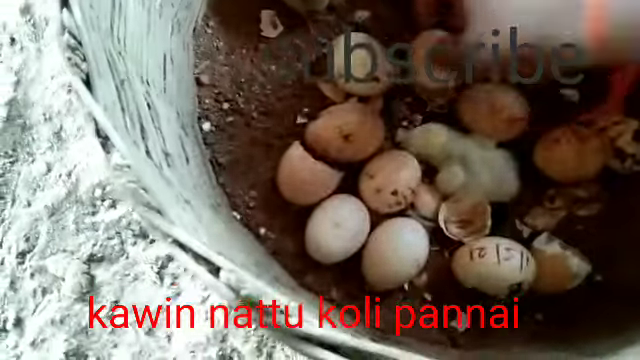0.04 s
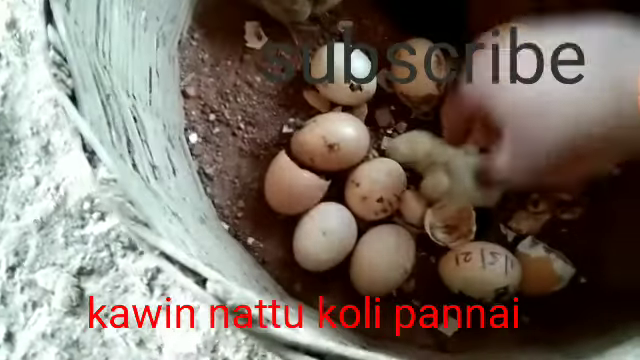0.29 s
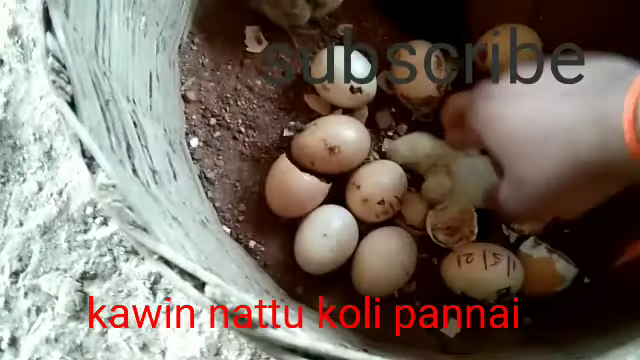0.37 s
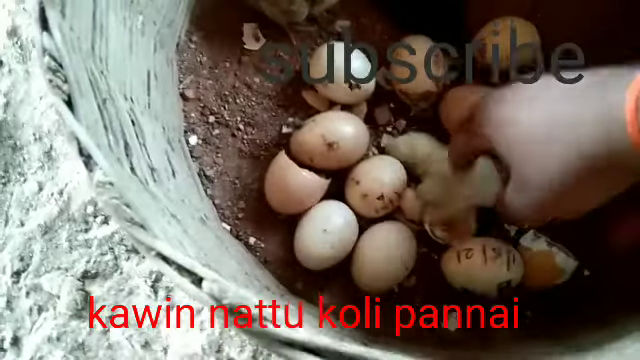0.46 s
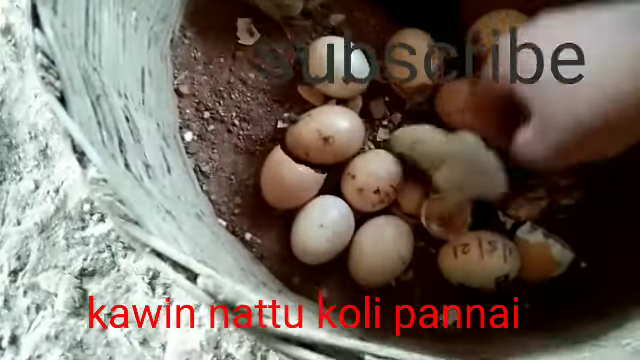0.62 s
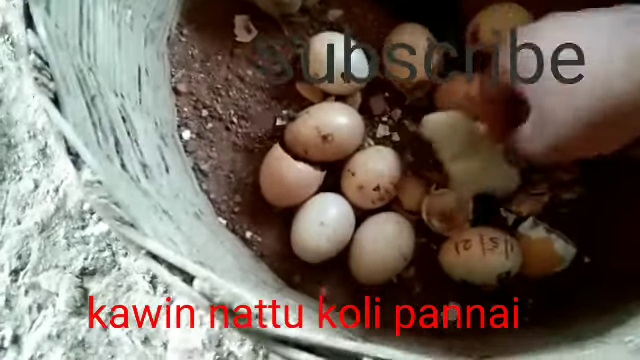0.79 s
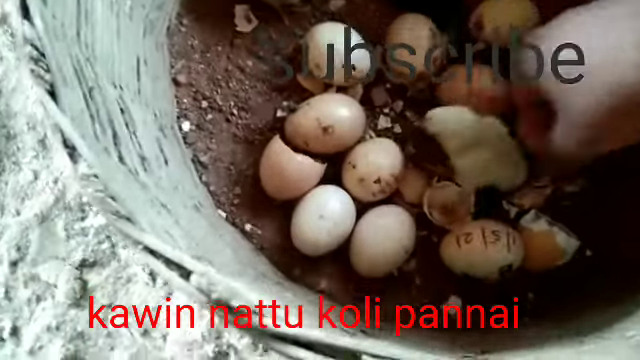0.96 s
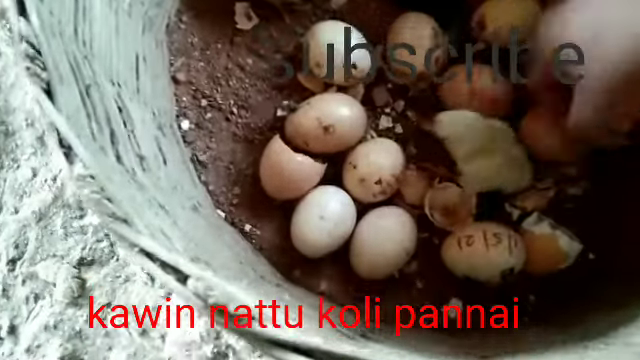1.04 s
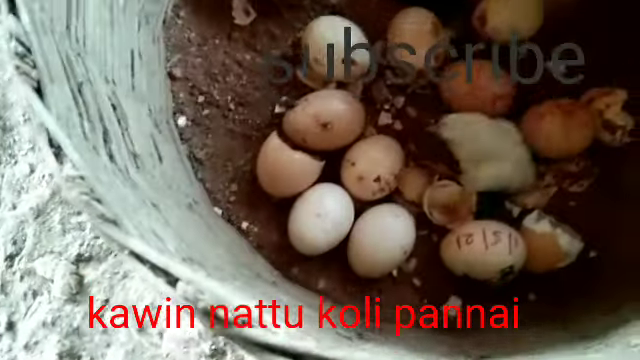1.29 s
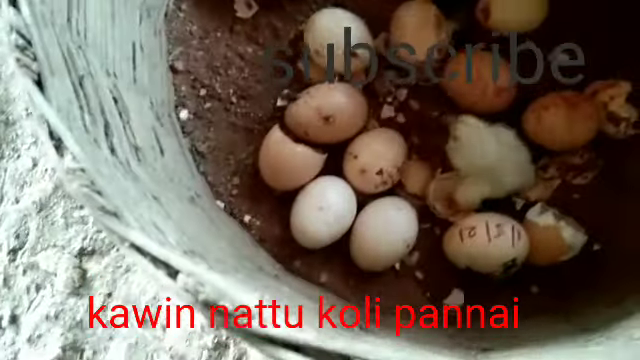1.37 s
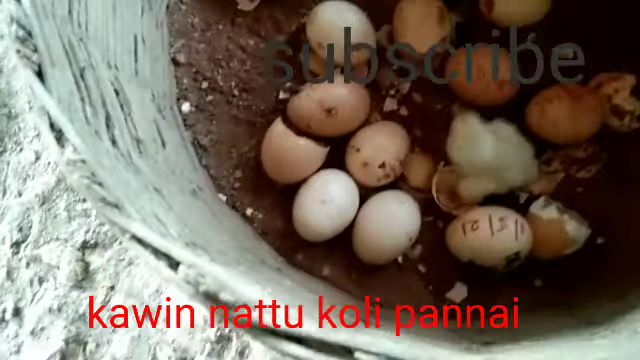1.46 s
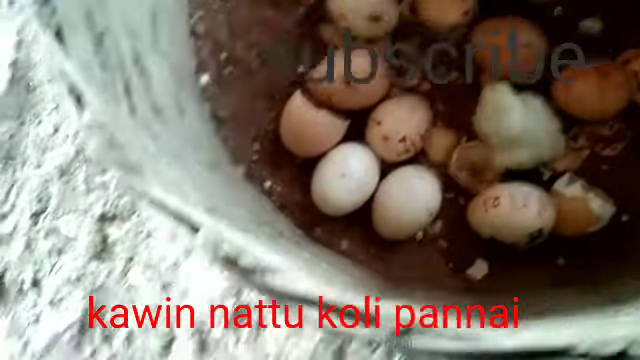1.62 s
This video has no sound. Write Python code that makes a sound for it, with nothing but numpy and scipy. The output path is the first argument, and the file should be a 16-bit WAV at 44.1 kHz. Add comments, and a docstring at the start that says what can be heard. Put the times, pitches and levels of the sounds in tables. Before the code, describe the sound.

A chick gives one loud falling cheep close by, just after a light egg knock and a brief rustle of litter. Softer peeps and an eggshell click follow, then a faint low rumble and a scuff, in a quiet shed.

```python
"""In a quiet shed, newly hatched chicks are heard from close by in a tub of eggs and litter. One chick gives a
loud falling cheep and others peep softly, all with whistle-like tones. A hand rustles the litter, brushes the
tub and clicks shells together, and an egg knocks. Faint poultry notes come from afar. Later a low rumble swells
and a short gritty burst sounds. The tub wall and the shed add short echoes."""
import sys
import numpy as np
from scipy import signal
from scipy.fft import rfft, irfft, next_fast_len
from scipy.io import wavfile

SR = 44100
rng = np.random.default_rng(int(sys.argv[2]) if len(sys.argv) > 2 else 0)


def wrap_up_sound(samples):
    """Save the sound to the file named by the first command line argument, as 16-bit audio."""
    columns = np.atleast_2d(samples).T
    # keep every value between -1 and 1, then stretch to whole-number steps
    tamed = np.clip(columns, -1, 1)
    steps = np.round(tamed * 32767).astype(np.int16)
    wavfile.write(sys.argv[1], SR, steps)


N = 74970
T = np.arange(N) / SR


def from_db(db):
    """Turn decibels into a number to multiply a sound by."""
    return 10 ** (np.asarray(db) / 20)


def rms_one(x):
    """Scale a signal so that its average strength (rms) is 1."""
    return x / np.sqrt(np.mean(x ** 2) + 1e-20)


def curve(rows, column=1):
    """Join the points of one table column with straight lines over time."""
    rows = np.array(rows)
    return np.interp(T, rows[:, 0], rows[:, column])


def envelope(rows, column=1, rounding_s=.002):
    """Loudness over time from a decibel column, with rounded corners and silence before and after."""
    gain = from_db(curve(rows, column)) * (T >= rows[0][0]) * (T <= rows[-1][0])
    window = np.hanning(int(rounding_s * SR))
    return np.convolve(gain, window / window.sum(), "same")


def band(x, low_hz, high_hz):
    """Keep the part of a sound between two frequencies."""
    edges_hz = [max(low_hz, 10), min(high_hz, SR * .45)]
    return signal.sosfilt(signal.butter(2, edges_hz, "band", fs=SR, output="sos"), x)


def flutter(rate_hz=250):
    """A quick random wobble with a typical size of 1."""
    return rms_one(band(rng.standard_normal(N), rate_hz / 10, rate_hz))


def colour(x, tone):
    """Make some frequencies stronger than others, following rows of frequency_hz, relative_db."""
    size = 2 * next_fast_len(N)
    octaves = np.log2(np.maximum(np.fft.rfftfreq(size, 1 / SR), 1))
    hz, db = np.transpose(tone)
    octaves_outside = np.abs(octaves - np.clip(octaves, np.log2(hz[0]), np.log2(hz[-1])))
    gain_db = np.interp(octaves, np.log2(hz), db) - 30 * np.minimum(octaves_outside, 2)
    # These steps make the filter ring after each click, never before it.
    cepstrum = irfft(np.log(rms_one(from_db(gain_db))))[:size // 2]
    cepstrum[1:] *= 2
    return irfft(rfft(x, size) * np.exp(rfft(cepstrum, size)))[:N]


def grains(per_s, spread_db=6):
    """Tiny clicks of uneven size at random moments."""
    sizes = from_db(spread_db * np.minimum(rng.exponential(1, N), 4))
    signs = rng.choice([-1, 1], N)
    return rms_one(sizes * signs * (rng.random(N) < per_s / SR))


def cracks(rows, decay_s):
    """Each contact makes a burst of noise that dies away quickly."""
    force = sum(from_db(db) * (T >= start_s) * np.exp(-np.abs(T - start_s) / decay_s)
                for start_s, db in rows)
    return force * rng.standard_normal(N)


def phase_of(pitch_hz, jitter):
    """The growing angle of a wave whose pitch wobbles by the fraction jitter."""
    return 2 * np.pi * np.cumsum(pitch_hz * (1 + jitter * flutter())) / SR


def background(hiss_db=-80.5):
    """A low rumble swells halfway through, over a faint hiss."""
    # Loudness of the rumble: time_s, level_db
    rumble_level = [(0, -73.5), (.1, -88), (.3, -85.5), (.45, -82), (.6, -76.5), (.72, -74), (.8, -76.5),
                    (.9, -63), (1.0, -56.5), (1.16, -60), (1.22, -55), (1.45, -58), (1.7, -55)]
    # Tone of the rumble and of the hiss: frequency_hz, relative_db
    rumble_tone = [(25, -21.5), (45, -18.5), (62, -5.5), (85, 2.5), (135, 1), (190, -6.5), (250, -20),
                   (400, -28), (600, -43)]
    hiss_tone = [(100, -0.5), (250, -4.5), (480, -12.5), (800, -16), (2100, -22), (3600, -19.5),
                 (6300, -25), (9900, -26.5), (10700, -13), (11900, -15.5), (12800, -25.5), (13800, -19),
                 (15400, -16.5)]
    rumble = from_db(curve(rumble_level)) * rms_one(colour(rng.standard_normal(N), rumble_tone))
    return rumble + from_db(hiss_db) * colour(rng.standard_normal(N), hiss_tone)


def shed_echo(x, delay_s=.0025, build_s=.0031):
    """Sound bounces around the shed, and each range of frequencies fades at its own speed."""
    # Time the echo takes to fade by 60 decibels: frequency_hz, fade_s
    fade_times = [(200, .35), (1000, 0.29), (2400, 0.23), (4000, 0.44), (6500, 0.17), (12000, 0.44)]
    # Tone of the echo: frequency_hz, relative_db
    echo_tone = [(150, -3.5), (900, 3.5), (2000, 1), (2500, 1.5), (3000, 0), (3500, -6), (4400, 0.5),
                 (5500, -5), (6300, 2), (7000, 0), (9000, -1.5), (14000, -9)]
    hz, fade_s = np.transpose(fade_times)
    edges_hz = np.geomspace(100, 16000, 16)
    tail = 0
    for low, high in zip(edges_hz, edges_hz[1:]):
        band_fade_s = np.interp(np.log(low * high) / 2, np.log(hz), fade_s)
        tail += band(rng.standard_normal(N), low, high) * from_db(-60 * T / band_fade_s)
    fade_in = np.clip((T - delay_s) / build_s, 0, 1)
    tail = colour(tail * fade_in, echo_tone)
    return signal.fftconvolve(x, tail / np.sqrt(np.sum(tail ** 2)))[:N]


def tub_echo(x, level_db=-16, fade_s=.1):
    """The nearby tub wall throws back many quick echoes."""
    echoes = rng.standard_normal(N) * from_db(-60 * np.minimum(T / fade_s, 3))
    return from_db(level_db) * signal.fftconvolve(x, echoes / np.sqrt(np.sum(echoes ** 2)))[:N]


def far_birds(fade_s=.01, waver_db=5):
    """Birds farther off call in short, faint, sliding notes."""
    # One note a row: start_s, length_s, start_hz, end_hz, level_db
    notes = [(0.187, 0.045, 792, 719, -77), (0.189, 0.037, 514, 516, -75.5), (0.31, 0.023, 898, 856, -79.5),
             (0.477, 0.039, 1146, 983, -78), (0.983, 0.033, 1200, 1087, -73.5),
             (1.026, 0.039, 780, 756, -76), (1.028, 0.057, 1120, 1185, -84.5),
             (1.02, 0.025, 2973, 3085, -80.5), (1.031, 0.021, 2654, 2430, -83),
             (1.079, 0.017, 477, 457, -61), (1.137, 0.041, 3730, 3980, -82),
             (1.167, 0.021, 3376, 3380, -81.5), (1.306, 0.045, 1190, 1150, -76),
             (1.308, 0.023, 820, 820, -82.5), (1.386, 0.058, 2023, 2130, -81),
             (1.406, 0.017, 3210, 2984, -77.5), (1.626, 0.034, 4710, 4730, -93.5)]
    calls = np.zeros(N)
    for start_s, length_s, start_hz, end_hz, level_db in notes:
        end_s = start_s + length_s
        fade = np.clip(np.minimum(T - start_s, end_s - T) / fade_s, 0, 1)
        pitch_hz = np.interp(T, [start_s, end_s], [start_hz, end_hz])
        calls += from_db(level_db) * fade * np.sin(phase_of(pitch_hz, jitter=.017))
    return np.sqrt(2) * calls * from_db(waver_db * flutter(rate_hz=33))


def hand_rub():
    """The hand brushes the tub with a dull rub."""
    # Loudness of the rub: time_s, level_db
    rub_level = [(.09, -91), (.12, -75), (.21, -74.5), (.25, -89), (.37, -78), (.45, -87)]
    return envelope(rub_level) * rms_one(band(rng.standard_normal(N), low_hz=157.8, high_hz=225))


def gritty_burst():
    """A short, gritty burst with a hollow low part and a thin high squeak."""
    # Loudness of the low part and of the squeak: time_s, level_db
    low_level = [(1.439, -82), (1.446, -58), (1.46, -59.5), (1.475, -55), (1.50, -53), (1.51, -57),
                 (1.53, -93)]
    squeak_level = [(1.462, -94), (1.471, -63.5), (1.481, -57.5), (1.502, -63.5), (1.512, -100),
                    (1.53, -100)]
    # Tone of each: frequency_hz, relative_db
    low_tone = [(160, -41), (280, -24), (356, -10), (475, -33.5), (713, 0.5), (973, -14.5), (1050, -8.5),
                (1270, -14), (1440, -18.5), (1560, -59), (1800, -44), (2340, -67), (3960, -120)]
    squeak_tone = [(3350, -37), (3600, 1.5), (3720, -20), (3900, 3.5), (4120, -0.5), (4500, -31.5),
                   (7400, -34), (8200, 2), (8750, -31), (9400, -7), (10200, -9), (11000, -16), (13000, -17),
                   (14000, -28)]
    grit = grains(per_s=4000)
    low_part = colour(grit * envelope(low_level), low_tone)
    return low_part + colour(grit * envelope(squeak_level), squeak_tone)


def shell_clicks():
    """Eggshells touch and ring very briefly."""
    # Each touch: start_s, level_db
    taps = [(.534, -58.5), (.538, -60), (.541, -60), (.5435, -52), (.546, -51)]
    # Tone of a shell: frequency_hz, relative_db
    shell_tone = [(410, -56), (700, -48), (1080, -6.5), (1230, -11), (1470, -11.5), (1590, -18),
                  (1700, -36), (1980, -28), (2660, -42), (3020, -14), (3300, -19.5), (4060, 4.5),
                  (4610, -7.5), (5040, -33), (5590, -11), (6270, -44), (6860, -21), (8210, -9.5),
                  (9820, -21.5), (10700, -14), (15000, -36)]
    return colour(cracks(taps, decay_s=.0026), shell_tone)


def egg_knock():
    """An egg knocks once on the tub floor."""
    # Tone of the knock: frequency_hz, relative_db
    knock_tone = [(180, -38), (300, -8), (740, 14), (1270, -8), (2340, 1), (3050, -2.5), (4220, -11.5),
                  (4550, -14.5), (4850, -31), (5290, -15), (6000, -17.5), (7800, -52.5), (13200, -120)]
    start_s, level_db = .0075, -48.5
    return colour(cracks([(start_s, level_db)], decay_s=.00294), knock_tone)


def litter_rustle():
    """Crumbs and shell chips crackle under the hand."""
    # Loudness of the rustle: time_s, level_db
    rustle_level = [(0, -47), (.012, -61), (.02, -65.5), (.07, -68.5), (.105, -81), (.116, -60.5),
                    (.14, -59.5), (.15, -81), (.2, -77), (.24, -95.5)]
    # Dry bits snapping: start_s, level_db
    snaps = [(.001, -54.5), (.072, -60.5), (.110, -60.5), (.116, -47.5), (.139, -51)]
    # Tone of the litter: frequency_hz, relative_db
    litter_tone = [(180, -37), (300, 0), (409, -23.5), (498, -4), (597, -16), (855, -7.5), (1040, -35.5),
                   (1490, -7.5), (1730, -14), (2210, 2.5), (3330, -18.5), (3550, -6.5), (4120, 1),
                   (4620, -24), (5260, -6.5), (5800, -12), (7420, 3.5), (12700, -19.5), (15000, -16)]
    crackle = envelope(rustle_level) * grains(per_s=11000) + cracks(snaps, decay_s=.00095)
    return colour(crackle, litter_tone)


def soft_peeps(octave_db=-32.5, waver_db=.5):
    """Chicks peep in soft warbling whistles, each with a weak tone an octave higher."""
    # One list of points for each peep: time_s, pitch_hz, level_db
    peeps = [
        [(.120, 4700, -61), (.128, 4840, -61.5), (.140, 4153, -52.5), (.148, 4680, -58), (.158, 4660, -65),
         (.163, 4560, -74)],
        [(.356, 4300, -78), (.366, 4650, -61), (.374, 4570, -56), (.380, 3945, -84.5), (.387, 4590, -51),
         (.395, 4850, -64.5), (.404, 3720, -50.5), (.410, 3780, -55.5), (.416, 4630, -61), (.432, 4420, -60),
         (.445, 4690, -69)],
        [(.647, 3550, -79), (.652, 3390, -62), (.660, 3517, -47), (.668, 3682, -58), (.677, 3813, -56),
         (.687, 3467, -46.5), (.694, 3327, -56.5), (.701, 3360, -66), (.705, 3360, -79)],
        [(.766, 4330, -91), (.778, 4250, -69), (.792, 4130, -84), (.803, 3900, -67), (.818, 3917, -83)],
    ]
    calls = np.zeros(N)
    for peep in peeps:
        phase = phase_of(curve(peep), jitter=.012)
        whistle = np.sin(phase) + from_db(octave_db) * np.sin(2 * phase)
        calls += envelope(peep, column=2) * whistle
    return np.sqrt(2) * calls * from_db(-waver_db * flutter())


def loud_cheep(swing, overtone_waver_db=3, waver_db=.21):
    """A chick's cheep slides down over an octave, swelling and growing richer before it fades."""
    # The falling main tone: time_s, pitch_hz
    pitch = [(.205, 5680), (.222, 5560), (.233, 5200), (.242, 4990), (.248, 4780), (.253, 4720),
             (.259, 4130), (.264, 4040), (.272, 3560), (.276, 3490), (.282, 3470), (.288, 3350),
             (.295, 3080), (.305, 2540), (.316, 2230)]
    # Its loudness: time_s, level_db
    main_level = [(.203, -81), (.212, -65), (.228, -49.5), (.231, -43), (.245, -36), (.251, -30),
                  (.255, -24.5), (.257, -45.5), (.259, -25), (.263, -25.5), (.270, -36), (.273, -23),
                  (.278, -24), (.288, -24), (.294, -27), (.299, -36.5), (.308, -56), (.322, -68.5)]
    # Overtones at two and three times its pitch: time_s, second_db, third_db
    overtones = [(.205, -97, -120), (.236, -69, -110), (.266, -74, -82.5), (.274, -46.5, -68.5),
                 (.286, -41.5, -63.5), (.294, -47.5, -71), (.301, -55.5, -73.5), (.308, -40, -65),
                 (.312, -48.5, -60.5), (.319, -66, -87.5)]
    # The chick's brief, higher second voice: time_s, pitch_hz, level_db
    high_voice = [(.229, 6610, -74.5), (.233, 6650, -54), (.238, 6890, -66.5), (.243, 7470, -62),
                  (.247, 7200, -77), (.252, 6720, -56.5), (.257, 6890, -78)]
    phase = phase_of(curve(pitch), jitter=.003)
    third = envelope(overtones, column=2)
    fourth = third * from_db(-25)
    voice = 0
    # swing multiplies all these decibel levels: below 1, the cheep is louder and more even.
    for k, gain in enumerate([envelope(main_level), envelope(overtones), third, fourth]):
        waver = from_db(k * overtone_waver_db * flutter())  # higher tones waver more
        voice += gain ** swing * waver * np.sin((k + 1) * phase)
    high_phase = phase_of(curve(high_voice), jitter=.01)
    voice += envelope(high_voice, column=2) ** swing * np.sin(high_phase)
    return np.sqrt(2) * voice * from_db(waver_db * flutter())


def scene():
    """Mix the chicks and the small noises with their echoes, then add the rub and the background."""
    # The quieter sources: sound, shed_echo_db
    quiet = [(soft_peeps(), -11), (far_birds(), -9.5), (litter_rustle() + egg_knock(), -14),
             (shell_clicks(), -8), (gritty_burst(), -10.5)]
    cheep = loud_cheep(swing=.99)
    soft = sum(sound for sound, _ in quiet)
    tub = tub_echo(soft + cheep * from_db(-11))
    even_cheep = loud_cheep(swing=.63) * from_db(-34)  # the shed gets a more even cheep
    shed = shed_echo(even_cheep + sum(sound * from_db(db) for sound, db in quiet))
    return (cheep + soft + tub + shed + hand_rub() + background())[None]


def record(dry):
    """Cut away the very highest treble steeply."""
    cutoff_hz = 15500
    return signal.sosfilt(signal.ellip(12, .1, 80, cutoff_hz, fs=SR, output="sos"), dry)


dry = scene()
out = record(dry)
wrap_up_sound(out)
```